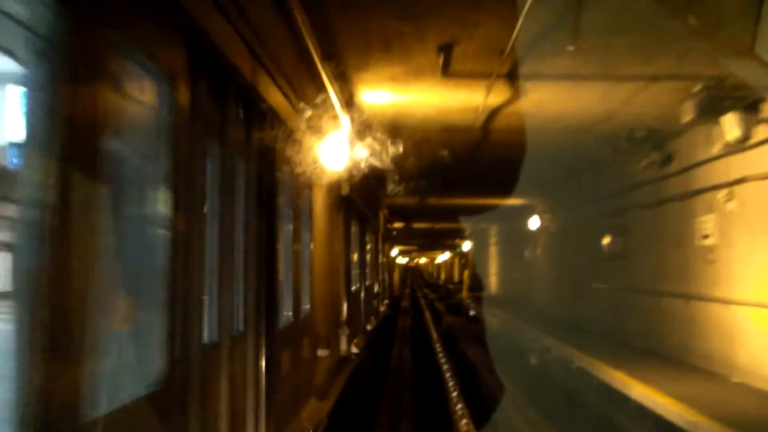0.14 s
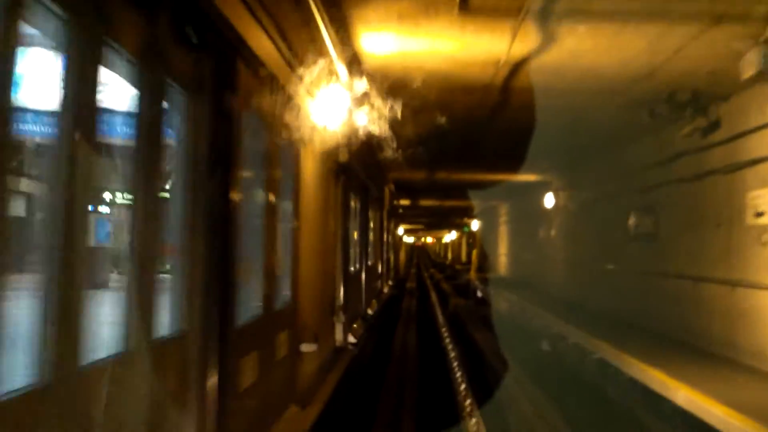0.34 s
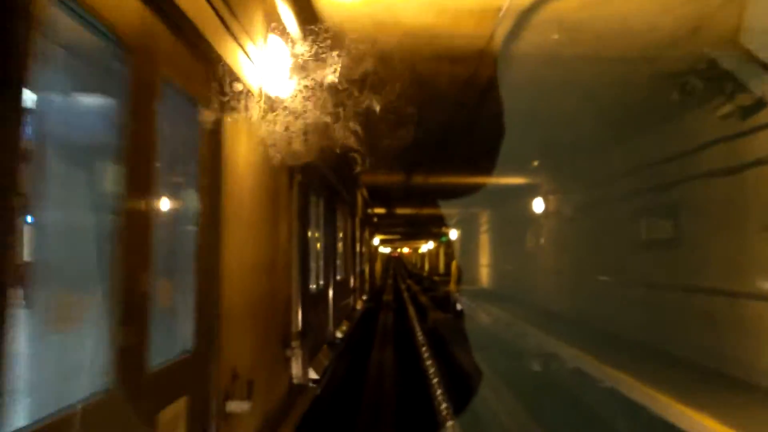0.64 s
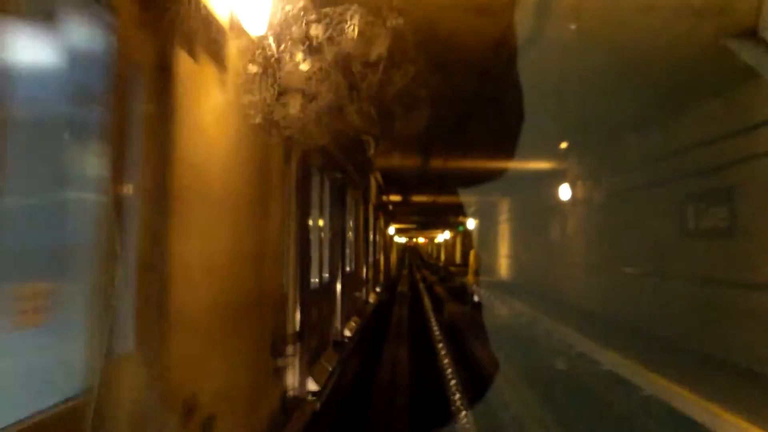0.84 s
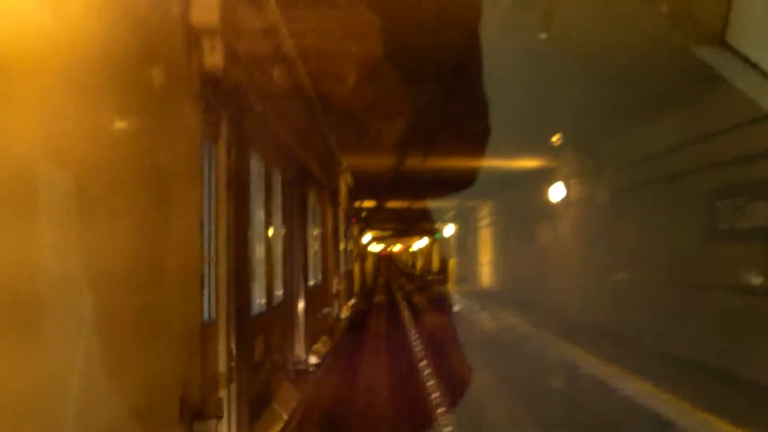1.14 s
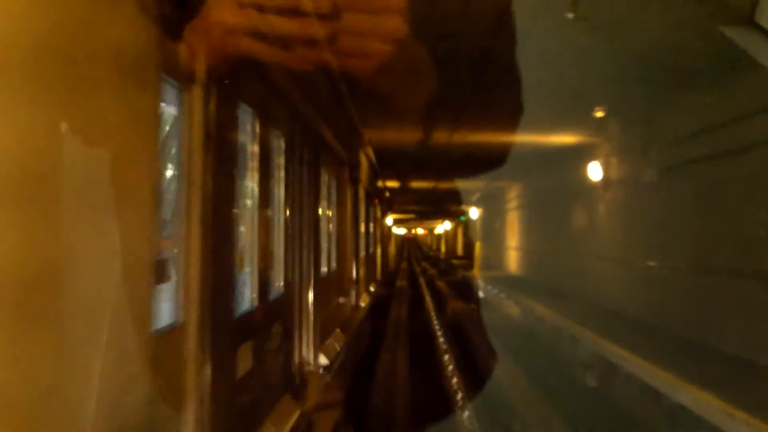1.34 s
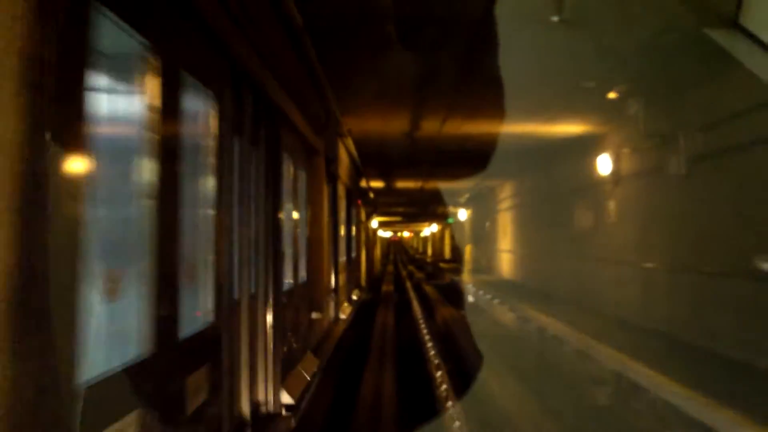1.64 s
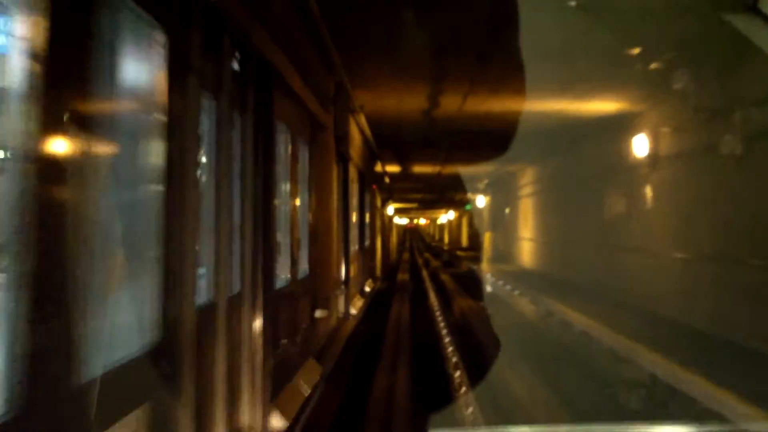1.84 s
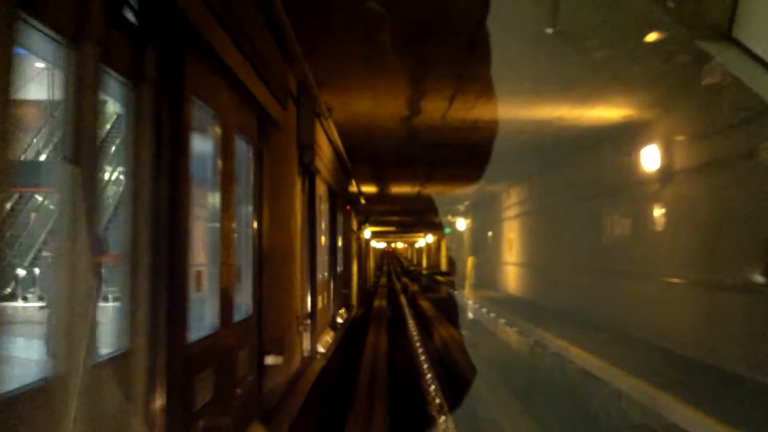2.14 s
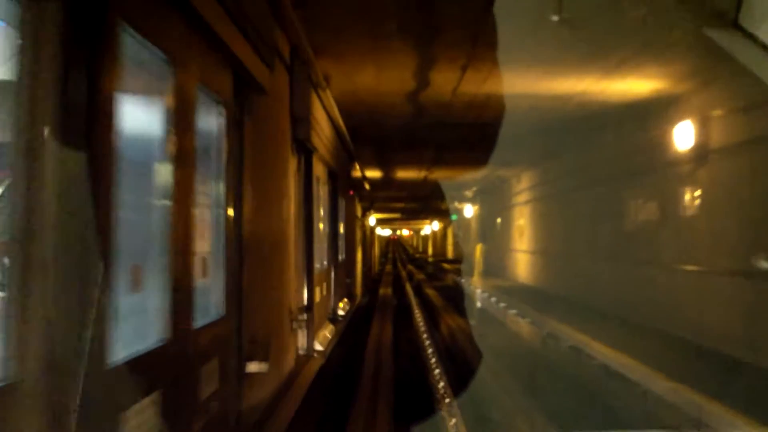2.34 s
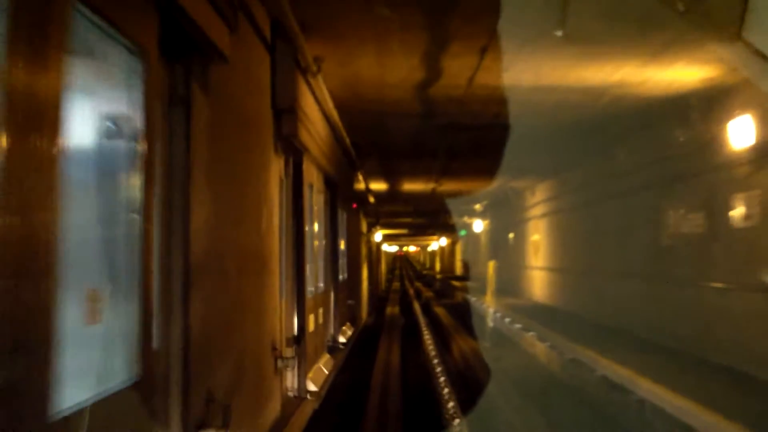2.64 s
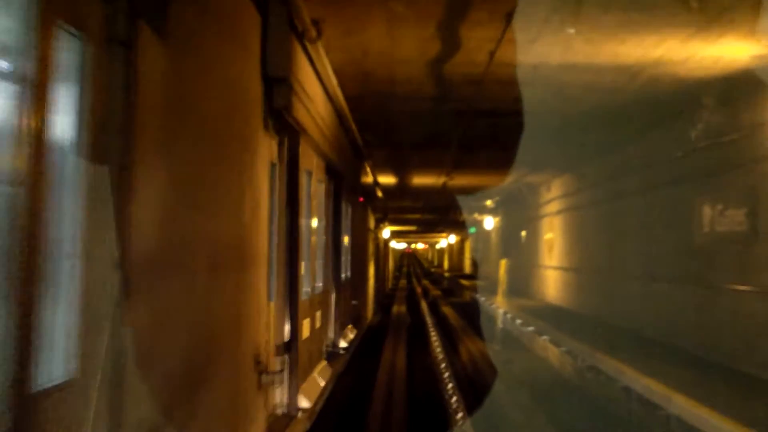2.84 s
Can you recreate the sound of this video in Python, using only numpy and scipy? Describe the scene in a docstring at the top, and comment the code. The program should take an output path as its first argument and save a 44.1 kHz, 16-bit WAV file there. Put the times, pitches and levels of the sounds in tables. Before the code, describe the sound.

A rubber-tyred train moves steadily through a tunnel, heard from inside. A strong low air buffet opens it, then irregular deep surges and dull thumps continue over tyre rumble, body drone, rough roar and faint whine. The roar ducks and swells as the microphone overloads, with tiny dry clicks throughout. Sparse, very high metal squeals appear from 0.4 seconds, thicken after 1.7, and crowd together from 2.4 to 3.

```python
"""First comes a strong low buffet of air: we are riding inside a rubber-tyred train in a tunnel.
Filtered noise makes the buffeting, the tyre rumble, the drone of the car body and an even roar; narrow bands
of noise make a faint whine and short high squeals of metal on the rail, which crowd together towards the end.
The buffeting drives the recorder's limiter: the roar ducks under each pressure surge and swells in the lulls.
Faint ticks ride on the pressure waves, and single dry clicks stand out."""
import sys
import numpy as np
from scipy import signal
from scipy.fft import rfft, irfft, next_fast_len
from scipy.io import wavfile
from scipy.ndimage import uniform_filter1d, minimum_filter1d, map_coordinates

SR = 44100
rng = np.random.default_rng(int(sys.argv[2]) if len(sys.argv) > 2 else 0)


def to_wav(sig):
    """Store sig (one row per channel, or 1-D mono) as 16-bit WAV at the path in sys.argv[1].

    Samples outside -1..1 are clipped; the rate is SR.
    """
    pcm = np.clip(np.atleast_2d(sig), -1, 1) * 32767
    pcm = np.round(pcm).astype(np.int16)
    wavfile.write(sys.argv[1], SR, pcm.T)  # frames by channels


N = 132300  # samples: 3 seconds

# The ..._TRIM_DB settings are added to the levels in their tables.
# All spectra give relative loudness only: the noise they shape is scaled to rms 1.

# Sharpest clicks of the crackle: (time [s], peak level before the trim [dB])
CLICKS = [(0.0433, -43.5), (0.1366, -53.5), (0.16, -53), (0.2567, -45.5), (0.2892, -45), (0.385, -42),
          (0.4274, -56), (0.5024, -39.5), (0.5544, -41.5), (0.6312, -46), (0.7687, -48), (0.845, -43.5),
          (0.9822, -50.5), (1.1952, -44), (1.217, -49.5), (1.3977, -52), (1.7285, -51), (1.8016, -47.5),
          (1.8352, -43.5), (1.931, -44.5), (2.1024, -39), (2.166, -43), (2.1987, -41), (2.379, -46.5),
          (2.5283, -39), (2.5619, -46.5)]
CLICK_TRIM_DB, CLICK_DECAY_S = 15.5, 0.00003
# Crackle and hiss of the recorder; tick levels are relative to the sound they ride on
TICKS_PER_S, TICK_DB, TICK_SPREAD_DB, TICK_DECAY_S = 135, -25.5, 2.5, 0.00004
HISS_DB = -72

# Tones of the drive: (pitch [Hz], level [dB])
WHINE_TONES = [(259, -42.5), (771, -54.5), (1497, -75.5), (1599, -58.5), (1856, -61), (2523, -65.5),
               (2636, -63), (2743, -67.5)]
WHINE_WIDTH_HZ = 13.1

# Pressure surges: (start [s], length [s], strength [dB])
SURGES = [(0.195, 0.091, -1.5), (0.479, .06, -5), (0.561, 0.1088, -5.5), (0.715, 0.0426, 0.5),
          (0.945, 0.0532, -3), (1.107, 0.064, -0.5), (1.218, 0.036, -2), (1.544, 0.0594, -3),
          (1.7, 0.0442, 5), (1.8, 0.068, 1.5), (2.075, 0.0421, 2), (2.153, 0.047, -1), (2.276, 0.0633, 0),
          (2.402, 0.0431, -2), (2.75, 0.0457, -12.5), (2.953, 0.099, -12)]
# Strength of the buffeting, with its lulls: (time [s], level before the trims [dB])
BUFFET_LEVEL = [(0, 0), (.08, -25.5), (.18, -10), (.23, -10.5), (.83, -11), (.88, -11), (.94, -22),
                (.98, -9), (1.2, -16.5), (1.42, -13), (1.48, -20), (1.67, -17.5), (1.72, -8.5), (2, -13.5),
                (2.05, -31.5), (2.12, -10.5), (2.5, -13), (2.62, -11.5), (2.84, -13), (2.92, -18), (3, -4)]
# Colour of the air turbulence: (frequency [Hz], relative level [dB])
TURBULENCE_SPECTRUM = [(3, -55), (7, -5), (10, -7.5), (17, 11.5), (23, -8), (30, 4.5), (36, -2.5),
                       (45, -40), (70, -40), (150, -96)]
TURBULENCE_TRIM_DB, PUMPING_TRIM_DB = 0.5, -2
PUMPING_HZ, PUMPING_WANDER = 17, 0.36  # middle rate, and its spread as a natural logarithm

# Thumps of the tyres on uneven track: (middle [s], pitch [Hz], peak level [dB])
THUMPS = [(0.124, 102.7, -25.5), (.382, 67, -8.5), (0.471, 88.6, -12), (0.547, 81.5, -13),
          (0.703, 72.2, -8), (0.898, 65, -16.5), (0.938, 97.8, -14), (1.184, 61.4, -16.5),
          (1.515, 96.6, -15.5), (1.616, 99.6, -17), (1.776, 86, -13), (2.061, 96, -17),
          (2.666, 87.4, -15.5), (2.95, 84, -13.5)]
THUMP_WIDTH_S = 0.01797

# Tyre rumble over time: (time [s], level before the trim [dB])
RUMBLE_LEVEL = [(0, -32), (.14, -20.5), (.25, -25), (.45, -24), (.7, -20.5), (.83, -23.5), (.93, -21),
                (1.05, -23.5), (1.38, -29.5), (1.51, -23.5), (1.77, -20.5), (1.89, -21), (2.02, -22),
                (2.16, -28), (2.3, -24.5), (2.42, -22), (2.58, -25), (2.77, -23.5), (3, -19.5)]
# Colour of the tyre rumble: (frequency [Hz], relative level [dB])
RUMBLE_SPECTRUM = [(25, 0.5), (40, -8.5), (60, 5.5), (78, -1.5), (100, -1.5), (118, -1), (135, -11),
                   (175, -16), (240, -24), (500, -95)]
# Low drone of the car body over time: (time [s], level before the trim [dB])
DRONE_LEVEL = [(0, -33), (.14, -29.5), (.25, -32.5), (.6, -33), (.94, -31), (1.4, -36), (1.51, -29),
               (1.85, -32), (2.05, -30), (2.15, -29.5), (2.53, -31.5), (2.62, -27.5), (2.82, -30),
               (2.925, -25), (3, -36.5)]
# Colour of the drone: (frequency [Hz], relative level [dB])
DRONE_SPECTRUM = [(90, -51), (145, -2), (178, 1.5), (205, -2.5), (235, -1.5), (260, 0), (305, -7.5),
                  (362, -3), (410, -13), (480, -13.5), (900, -51.5)]
RUMBLE_TRIM_DB, DRONE_TRIM_DB = 3.5, -1
# Roar over time: (time [s], level [dB])
ROAR_LEVEL = [(0, -34.5), (.11, -34.5), (.18, -32), (.24, -38), (.32, -34), (.48, -33), (.6, -35.5),
              (.71, -31), (.83, -36.5), (.89, -33.5), (.94, -31), (1.02, -38), (1.1, -36), (1.38, -38.5),
              (1.46, -38), (1.515, -31), (1.575, -36.5), (1.625, -28.5), (1.66, -37.5), (1.695, -32),
              (1.74, -29.5), (1.9, -35), (2, -37), (2.07, -30), (2.15, -35), (2.26, -32.5), (2.38, -33),
              (2.55, -34), (2.6, -32), (2.68, -31), (2.735, -30), (2.78, -37), (2.87, -31), (2.93, -31),
              (3, -33.5)]
# Colour of the roar: (frequency [Hz], relative level [dB])
ROAR_SPECTRUM = [(100, 3.5), (250, -4.5), (450, 1), (750, -0.87), (1050, -2.05), (1500, -6), (2100, -13.5),
                 (2800, -14), (3700, -22), (6000, -42)]
# Treble sizzle against the roar: (time [s], level before the trim [dB])
SIZZLE_LEVEL = [(0, -3.5), (1.2, -2), (1.9, -1.5), (2.4, -0.5), (3, -1.5)]
# Colour of the sizzle: (frequency [Hz], relative level [dB])
SIZZLE_SPECTRUM = [(2500, -20), (4000, -1), (5500, 0), (6700, 0), (7700, -1.5), (8400, -6), (9500, -2),
                   (10600, -5), (11900, -21), (15500, -28)]
SIZZLE_TRIM_DB = -14.5

# Squeals of metal on the rail:
# (start [s], time until it begins to die away [s], pitch [Hz], width [Hz], level before the trim [dB])
SQUEALS = [ (0.071, 0.024, 9600, 450, -54.5), (0.447, 0.057, 6384, 60, -45.5),
           (0.652, 0.11, 13780, 70, -65), (0.852, 0.084, 6380, 55, -49), (1.042, 0.027, 6550, 250, -51),
           (1.37, 0.4, 7570, 110, -57.5), (1.45, 0.0256, 6440, 250, -50.5), (1.482, 0.053, 10270, 150, -56),
           (1.712, 0.062, 10560, 80, -48.5), (1.748, 0.101, 7885, 129, -50.5),
           (1.913, 0.195, 7600, 200, -50), (1.953, 0.088, 10070, 108, -51.5), (2.003, 0.142, 9463, 73, -47),
           (2.115, 0.13, 7910, 111, -53), (2.18, 0.068, 9330, 70, -49.5), (2.184, 0.042, 10920, 90, -53.5),
           (2.218, 0.064, 7450, 120, -48.5), (2.24, 0.14, 7180, 130, -47.5), (2.407, 0.07, 11300, 70, -52),
           (2.55, 0.069, 11200, 80, -58), (2.828, 0.092, 10990, 90, -52), (2.443, 0.129, 9538, 80, -41),
           (2.438, 0.082, 10350, 59.7, -52.5), (2.451, 0.053, 7660, 100, -44),
           (2.213, 0.34, 8210, 110, -54.5), (2.56, 0.23, 10760, 70, -53), (2.658, 0.063, 10600, 100, -53),
           (2.568, 0.143, 8140, 122, -47), (2.55, 0.057, 13800, 150, -65), (2.66, .07, 14950, 250, -65),
           (2.77, 0.205, 14100, 250, -64.5), (2.652, 0.096, 9440, 90, -50.5),
           (2.638, 0.097, 7565, 130, -41), (2.763, 0.147, 7140, 90, -44.5), (2.848, 0.2, 8380, 35, -46),
           (2.853, 0.1, 10520, 170, -47.5), (2.875, 0.14, 7880, 100, -42), (2.9, 0.13, 9500, 140, -50)]
SQUEAL_TRIM_DB, ATTACK_S, RELEASE_S = -3, 0.027, 0.0745
FLUTTER_DB, FLUTTERS_PER_S = 1.5, 30.107  # slower unsteadiness of loudness
RASP_DB, RASPS_PER_S = 2, 170  # faster unsteadiness of loudness
SQUEAL_WAVER_HZ = 27.78  # unsteadiness of pitch

# Recorder
CEILING_DB, RECOVERY_S, LOOK_AHEAD_S = -8.5, 0.0531, 0.00146
LOW_CUT_HZ, TOP_HZ = 2, 15800


def amp(db):
    """Turn decibels into a gain."""
    return 10 ** (np.asarray(db) / 20)


def unit(x):
    """Scale to rms 1, a standard average loudness."""
    return x / np.sqrt(np.mean(x ** 2) + 1e-20)


def curve(rows):
    """Join (time, value) points by straight lines, one value per sample."""
    return np.interp(np.arange(N) / SR, *np.transpose(rows))


def wobble(rate):
    """Draw a smooth random curve through `rate` random points a second."""
    points = rng.standard_normal(N // 20)
    return map_coordinates(points, [np.arange(N) * rate / SR + 2])


def filtered(x, response):
    """Multiply each frequency in x by the gain that response gives for it."""
    size = next_fast_len(N + SR // 2)  # padded so the end does not wrap round to the start
    hz = np.fft.rfftfreq(size, 1 / SR)
    return irfft(rfft(x, size) * response(hz), size)[:N]


def rush(spectrum, patchy_db):
    """Make coloured noise of rms 1, with random louder and softer patches in time and frequency."""
    grid = signal.stft(rng.standard_normal(N), nperseg=512)[2]
    patches = uniform_filter1d(rng.standard_normal(grid.shape), 5, 0)
    patches = unit(uniform_filter1d(patches, 12, 1))
    noise = signal.istft(grid * amp(patchy_db * patches), nperseg=512)[1][:N]
    f, db = np.transpose(spectrum)

    def colour(hz):
        return amp(np.interp(np.log(hz + 1), np.log(f + 1), db))

    return unit(filtered(noise, colour))


def ring(pitch_hz, width_hz, waver_hz=0):
    """A resonance kept ringing by friction: a fuzzy tone of rms 1 whose pitch may waver."""
    hz = np.fft.rfftfreq(N, 1 / SR)
    resonance = 1 / (1 + ((hz - pitch_hz) / width_hz) ** 2)
    line = signal.hilbert(irfft(rfft(rng.standard_normal(N)) * resonance, N))
    evened = line / np.sqrt(np.abs(line) + 1e-12)  # softens the swings in loudness
    drift = np.exp(2j * np.pi * np.cumsum(waver_hz * wobble(25)) / SR)
    return unit((evened * drift).real)


def ticks(x):
    """A faint irregular crackle; each tick scales with the pressure wave that it rides on."""
    sizes = amp(TICK_DB + TICK_SPREAD_DB * np.minimum(rng.standard_normal(N), 2))
    hits = sizes * (rng.random(N) < TICKS_PER_S / SR)
    return x * signal.lfilter([1], [1, -np.exp(-1 / (TICK_DECAY_S * SR))], hits)


def clicks():
    """Single dry clicks: sudden steps up or down that die away almost at once."""
    hits = np.zeros(N)
    for time, db in CLICKS:
        hits[round(time * SR)] = amp(db + CLICK_TRIM_DB) * rng.choice([-1, 1])
    return signal.lfilter([1], [1, -np.exp(-1 / (CLICK_DECAY_S * SR))], hits)


def whine():
    """Faint, slightly unsteady tones of the drive, each a narrow band of noise."""
    return sum(amp(db) * ring(hz, WHINE_WIDTH_HZ) for hz, db in WHINE_TONES)


def surges():
    """Each pressure surge is a steep push followed by a weaker rebound."""
    t, out = np.arange(N) / SR, np.zeros(N)
    for start, length, db in SURGES:
        progress = np.clip((t - start) / length, 0, 1)
        out += amp(db) * np.sin(2 * np.pi * progress) * np.cos(np.pi * progress / 2)
    return out


def air():
    """Very slow pressure waves: turbulence, pumping at a wandering rate, and single surges."""
    rate = PUMPING_HZ * np.exp(PUMPING_WANDER * wobble(18))
    pumping = unit(np.sin(2 * np.pi * np.cumsum(rate) / SR))
    turbulence = rush(TURBULENCE_SPECTRUM, patchy_db=-1.0)
    buffeting = amp(TURBULENCE_TRIM_DB) * turbulence + amp(PUMPING_TRIM_DB) * pumping
    return amp(curve(BUFFET_LEVEL)) * buffeting + surges()


def thumps():
    """Each bump sways the car body for a few cycles, swelling and fading smoothly."""
    t, out = np.arange(N) / SR, np.zeros(N)
    for middle, hz, db in THUMPS:
        envelope = np.exp(-((t - middle) / THUMP_WIDTH_S) ** 2)
        out += amp(db) * envelope * np.sin(2 * np.pi * (hz * (t - middle) + rng.random()))
    return out


def tyres():
    """Lumpy rumble and a drone through the car body, and the rough roar and sizzle thrown back by the tunnel."""
    bumps_db = 1.05 * wobble(34.901)  # shared, so that all the layers swell together
    rumble_gain = amp(curve(RUMBLE_LEVEL) + RUMBLE_TRIM_DB + bumps_db)
    rumble = rumble_gain * rush(RUMBLE_SPECTRUM, patchy_db=1.0)
    drone_gain = amp(curve(DRONE_LEVEL) + DRONE_TRIM_DB + 1.36 * bumps_db)
    drone = drone_gain * rush(DRONE_SPECTRUM, patchy_db=-0.3344)
    sizzle = amp(SIZZLE_TRIM_DB + curve(SIZZLE_LEVEL)) * rush(SIZZLE_SPECTRUM, patchy_db=2.0)
    roar = rush(ROAR_SPECTRUM, patchy_db=1.1055) + sizzle
    return rumble + drone + amp(curve(ROAR_LEVEL) + 0.983 * bumps_db) * roar


def squeals():
    """Sliding contacts catch on one high mode after another; each swells, flutters, rasps and dies away."""
    t, out = np.arange(N) / SR, np.zeros(N)
    for start, length, hz, width, db in SQUEALS:
        swell = np.clip((t - start) / ATTACK_S, 0, 1)
        fade = np.exp(-np.maximum(t - start - length, 0) / RELEASE_S)
        flutter_db = FLUTTER_DB * wobble(FLUTTERS_PER_S) + RASP_DB * wobble(RASPS_PER_S)
        out += amp(db + flutter_db) * swell * fade * ring(hz, width, SQUEAL_WAVER_HZ)
    return amp(SQUEAL_TRIM_DB) * out


def scene():
    """Everything at one microphone in the car."""
    return (whine() + air() + thumps() + tyres() + squeals())[None]


def limiter(x):
    """Peaks over the ceiling pull the gain down quickly; it then recovers exponentially."""
    fall = np.arange(N) / SR / RECOVERY_S
    excess_db = np.maximum(20 * np.log10(np.abs(x) + 1e-9) - CEILING_DB, 1e-9)
    # Hold the highest excess so far, while each one shrinks with time
    held_db = np.exp(np.maximum.accumulate(np.log(excess_db) + fall) - fall)
    size = max(int(LOOK_AHEAD_S * SR), 1)
    gain_db = uniform_filter1d(minimum_filter1d(-held_db, size), size)
    return x * amp(gain_db)


def record(dry):
    """The hard-driven recorder limits peaks, crackles, hisses faintly and cuts all above its band limit."""
    limited = limiter(dry[0])
    hiss = amp(HISS_DB) * rng.standard_normal(N)
    noisy = limited + ticks(limited) + clicks() + hiss

    def band(hz):
        return (hz < TOP_HZ) * hz / np.hypot(hz, LOW_CUT_HZ)

    return filtered(noisy, band)[None]


dry = scene()
out = record(dry)
to_wav(out)
```